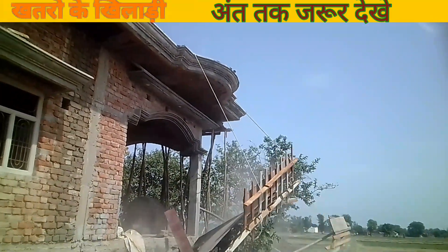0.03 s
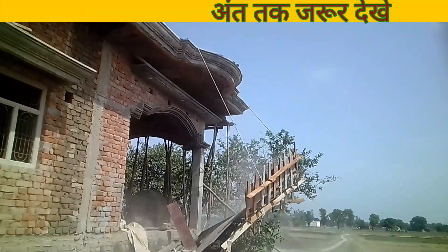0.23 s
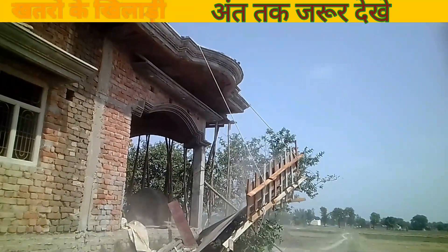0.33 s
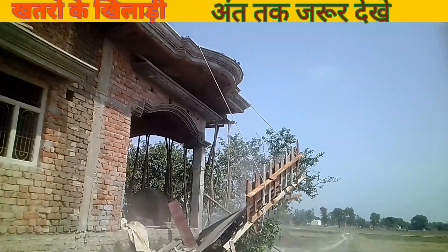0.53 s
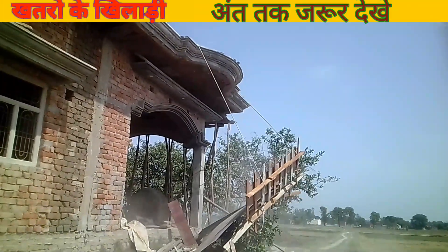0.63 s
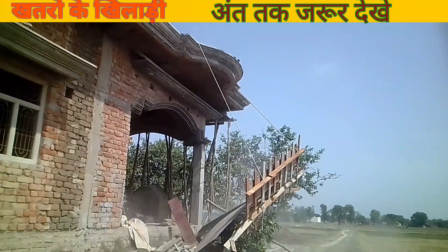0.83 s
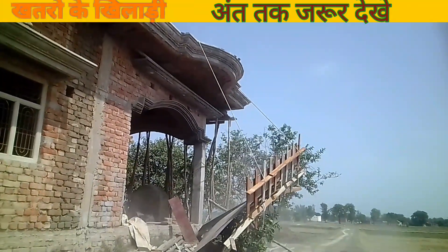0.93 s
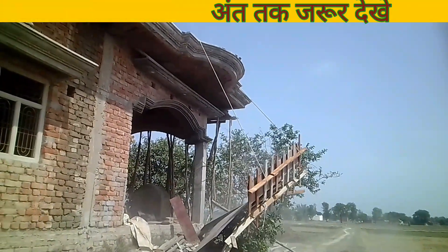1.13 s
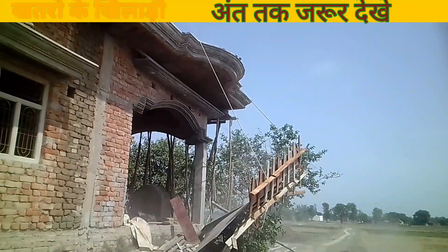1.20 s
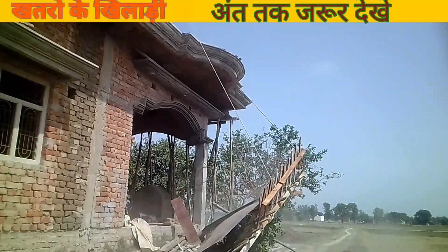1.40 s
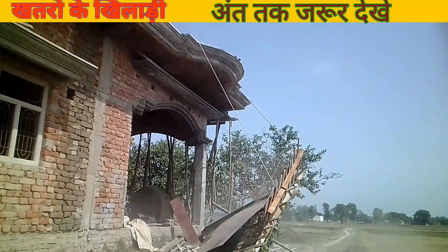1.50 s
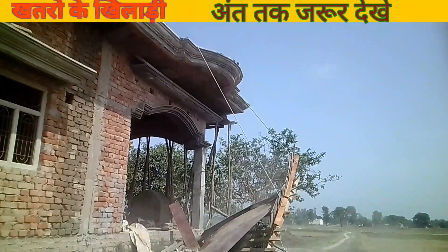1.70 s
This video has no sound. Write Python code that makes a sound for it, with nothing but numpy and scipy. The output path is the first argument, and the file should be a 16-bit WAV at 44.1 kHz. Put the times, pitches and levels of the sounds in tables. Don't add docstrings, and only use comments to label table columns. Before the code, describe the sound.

A timber and sheet-metal roof crashes down outdoors with dull thuds, rattling metal and settling debris.

```python
import sys
import numpy as np
from scipy import signal
from scipy.fft import rfft, irfft
from scipy.io import wavfile

SR = 44100
rng = np.random.default_rng(int(sys.argv[2]) if len(sys.argv) > 2 else 0)


def store_wav(level_fs):
    pcm = np.round(np.clip(np.atleast_2d(level_fs), -1, 1) * 32767)
    wavfile.write(sys.argv[1], SR, pcm.T.astype(np.int16))


def volts_from_decibels(level):
    exponent = np.asarray(level, float) / 20
    return 10 ** exponent


N = 77175

# frequency in Hz, level in dB per Hz.
AIR_SPECTRUM = [(18, -58), (30, -15), (145, -30), (295, -0.5), (586, -7.5), (789, -26), (1840, -14),
                (3040, -26.5), (7080, -29.5), (9200, -39.5), (15600, -120)]
# peak in seconds, level in dB, rise in seconds, fall in seconds, centre in Hz.
FALL_THUDS = [(.115, -56.5, 0.029, 0.0074, 396), (.198, -29, 0.014, 0.0086, 560),
              (.222, -25.5, 0.013, 0.019, 600), (.256, -23.5, 0.003, 0.024, 680),
              (.272, -28.5, 0.0045, 0.0056, 323), (.298, -29, 0.028, 0.0046, 420),
              (.350, -38, 0.02, 0.14, 330), (.411, -30.5, 0.0027, 0.0084, 300.7),
              (.460, -27.5, 0.041, 0.02, 524), (.526, -35, 0.033, 0.012, 282),
              (.572, -35, 0.014, 0.013, 440), (.610, -36.5, 0.0081, 0.011, 417),
              (.640, -40.5, 0.0046, 0.0093, 426), (.695, -44.5, 0.041, 0.0066, 420)]
# peak in seconds, level in dB, rise in seconds, fall in seconds, centre in Hz.
SETTLING_THUDS = [(0.772, -39.5, 0.015, 0.032, 377), (0.848, -39.5, 0.0021, .008, 467),
                  (0.872, -48, 0.01, 0.0051, 475), (0.943, -51.5, 0.034, 0.093, 247),
                  (1.008, -43.5, 0.018, 0.028, 480), (1.041, -53, 0.012, 0.017, 481.5),
                  (1.123, -60, 0.016, 0.025, 439), (1.220, -65, .015, .04, 402),
                  (1.311, -52.5, 0.011, 0.015, 529), (1.533, -46, 0.0012, 0.029, 580),
                  (1.602, -44, 0.0086, 0.008, 580), (1.698, -57, 0.039, 0.0077, 376)]
# peak in seconds, level in dB, rise in seconds, fall in seconds, centre in Hz.
SHEET_CLATTER = [(.118, -59, .001, 0.011, 1640), (.165, -46, 0.0023, 0.0099, 2000),
                 (.200, -27.5, 0.0099, 0.0054, 1590), (.226, -27.5, 0.014, 0.02, 1640),
                 (.255, -29.5, .003, .01, 2200), (.272, -22, 0.01, 0.017, 1920),
                 (.303, -26, 0.072, 0.016, 1390), (.345, -34.5, 0.0089, 0.019, 2110),
                 (.408, -23, 0.0031, 0.0012, 2210), (.424, -28.5, 0.0036, 0.0056, 1750),
                 (.466, -22, 0.011, 0.0083, 1918), (.526, -41.5, 0.0014, 0.066, 2240),
                 (.580, -36.5, 0.023, 0.0087, 1235), (.612, -46, 0.0084, 0.037, 1533),
                 (.795, -52.5, 0.08, 0.02, 2200), (.934, -54, 0.0011, 0.014, 2410),
                 (1.002, -43.5, 0.0011, 0.0037, 2260), (1.035, -44, 0.042, 0.013, 1600),
                 (1.297, -61.5, 0.001, 0.0054, 2210), (1.312, -45.5, 0.0093, 0.014, 1814),
                 (1.460, -52.5, 0.0024, 0.012, 1636), (1.533, -34, 0.0016, 0.021, 1620),
                 (1.598, -36, 0.0079, 0.015, 1680), (1.688, -55, 0.001, 0.012, 1710),
                 (1.730, -68, 0.0043, 0.057, 1730)]
# peak in seconds, level in dB, rise in seconds, fall in seconds, centre in Hz.
CHIP_CRACKS = [(.181, -40, 0.0014, 0.027, 4170), (.252, -32, 0.0012, 0.032, 3890),
               (.272, -32, 0.02, 0.011, 4470), (.350, -53, 0.024, 0.037, 3900),
               (.408, -35, .002, 0.0022, 6550), (.4145, -35.5, 0.00091, 0.0024, 4280),
               (.4185, -24, 0.00092, 0.0045, 3990), (.442, -41.5, 0.024, 0.059, 4420),
               (.526, -57, .003, 0.045, 3680), (.567, -48.5, .003, 0.011, 3900),
               (.656, -41, 0.0004, 0.0031, 3170), (.690, -66.5, 0.03, 0.034, 4450),
               (.789, -56.5, 0.001, 0.014, 3520), (.934, -64.5, 0.0011, 0.011, 3670),
               (.968, -65.5, .001, 0.0041, 5300), (.828, -62, 0.0015, 0.011, 6960),
               (1.002, -61, 0.0006, 0.019, 4100), (1.297, -64.5, .001, 0.011, 3800),
               (1.329, -74.5, .001, 0.0052, 5500), (1.458, -69.5, 0.0013, 0.01, 4530),
               (1.533, -39, 0.0014, 0.024, 5000), (1.596, -40.5, 0.0015, 0.021, 5100),
               (1.700, -64, .002, 0.0056, 5000), (1.728, -69, 0.002, 0.008, 5400)]
# frequency in Hz, level in dB, T60 in seconds.
BOARD_MODES = [(254.9, -2, 0.15), (272.2, -2, 0.16), (330, 2, 0.045), (356.6, 1, 0.13), (420, -5, 0.059),
               (468.8, -3.5, 0.13), (504.3, 3, 0.077), (531.5, -5, 0.13), (592.8, 3, 0.061),
               (625.8, -2.5, 0.1), (720.6, -2, 0.063), (749, -6.5, 0.13)]
# frequency in Hz, level in dB, T60 in seconds.
SLAB_MODES = [(3480, -3.5, 0.065), (3560, -7.5, 0.18), (3795, -11.5, 0.12), (3920, -6.5, 0.096),
              (4490, -4, 0.07), (4926, -10.5, 0.066), (5470, -17.5, 0.22), (5380, -3.5, 0.055),
              (6900, -9.5, 0.072)]
# start in seconds, peak in dB, frequency in Hz, T60 in seconds.
HARD_KNOCKS = [(0.2454, -4.5, 407.4, 0.022), (.4135, -9, 2268, 0.02), (.4165, -13, 3504, 0.015),
               (.601, -24.5, 387, 0.035), (.608, -16, 390, 0.027), (1.030, -53.5, 732, 0.19),
               (.524, -33, 2440, 0.027), (.657, -27, 465, 0.059), (0.85, -38.5, 477, 0.029),
               (1.530, -38, 1487, 0.048), (1.592, -35, 1510, 0.036), (1.5975, -28.5, 1622, 0.037),
               (1.596, -43, 900, 0.033), (1.698, -48, 390, 0.14), (1.739, -47, 373, 0.069)]
# start in seconds, peak in dB,
# frequency in Hz, T60 in seconds.
LOW_KNOCKS = [(.220, -20, 497, 0.043), (.229, -21, 480, .022), (.260, -16, 460, 0.028),
              (.268, -17, 338, 0.061), (.280, -17.5, 408, 0.041), (.289, -16.5, 513, 0.029),
              (.410, -22.5, 410, 0.025), (.456, -24, 533, 0.037), (.466, -22.5, 412, .04),
              (.475, -30.5, 530, 0.022), (.494, -26.5, 446, 0.024), (0.635, -27.5, 389, 0.047),
              (.647, -25.5, 489, 0.024), (.678, -30, 380, 0.034), (.687, -30.5, 473, 0.027),
              (.696, -35.5, 370, 0.027), (0.706, -35, 403, 0.033), (.774, -36.5, 530, 0.033),
              (.792, -35, 484, 0.035), (.804, -36, 361, 0.036), (.866, -41, 550, 0.028),
              (1.011, -36.5, 485, .04), (1.04, -45, 560, 0.022), (1.067, -42.5, 498, 0.022)]
# start in seconds, peak in dB, frequency in
# Hz, T60 in seconds.
BRIGHT_KNOCKS = [(.224, -22.5, 2270, 0.022), (.251, -21.5, 2330, 0.019), (.268, -21, 2050, .03),
                 (.300, -25.5, 2310, 0.034), (.308, -21.5, 1325, 0.025), (.4165, -21, 4040, 0.0087),
                 (.420, -20, 4720, 0.012), (.419, -13.5, 2019, 0.016), (.424, -22.5, 1451, .03),
                 (.427, -21.5, 2370, 0.016), (.448, -26.5, 3200, .015), (.448, -28.5, 1975, 0.019),
                 (.463, -23, 2421, 0.021), (.9425, -48.5, 2470, 0.023), (.973, -52, 2350, 0.023),
                 (1.003, -42, 2043, 0.022), (1.004, -52, 3570, 0.024), (1.030, -45, 1516, 0.064),
                 (1.531, -40, 4990, 0.022), (1.533, -39, 1211, 0.024), (1.597, -44, 1811, 0.2),
                 (1.615, -46, 1866, .08), (1.686, -49.5, 1790, 0.045), (1.725, -52.5, 1860, 0.063),
                 (1.725, -58, 2850, 0.049)]

AIR_DB = -68.5
PORCH_T60_S, PORCH_DB, PORCH_TOP_HZ = 0.54, -20, 3000
MIC_LOW_HZ, MIC_TOP_HZ, HISS_DB = 206.5, 5795, -88
BASS_LEAK_DB, TREBLE_LEAK_DB, AIRY_LEAK_DB = -23.5, -19, -26.5
GROUND_DIP_HZ, GROUND_DIP_WIDTH_HZ, GROUND_DIP = 3130, 350, 0.23
SQUEAK_S, SQUEAK_LENGTH_S, SQUEAK_DB = 1.398, 0.071, -64
SQUEAK_HZ, SQUEAK_RISE_HZ, SQUEAK_FLUTTER = 2550, 71, 0.45
GATHER_MAX_S = 0.08
KNOCK_RISE_S = 0.0025
CRACKS_PER_S, CRACK_SCATTER_DB, CRACK_WIDTH, CRACK_DB = 5000, 4.5, 0.38, -1.5
SLAB_FROM_S, SLAB_RING_DB = 1.5, -12
CLATTER_PER_S, CLATTER_SCATTER_DB, CLATTER_WIDTH, CLATTER_DB = 2800, 4.5, 0.57, -0.5
SHEET_LOW_HZ, SHEET_TOP_HZ, SHEET_T60_S = 944.5, 2852, 0.079
SHEET_MODES, SHEET_RING_DB = 36, -2
THUDS_PER_S, THUD_SCATTER_DB, THUD_WIDTH, THUD_DB = 1200, 3.5, 0.42, 1.5
THUMP_DB, BOARD_TOP_HZ = -8, 810


def unit(x):
    return x / np.sqrt(np.mean(x ** 2))


def lowpass(x, order, hz):
    return signal.sosfilt(signal.butter(order, hz, fs=SR, output="sos"), x)


def band(x, hz, width_hz, order=1):
    half = np.sqrt(1 + (width_hz / hz / 2) ** 2) + width_hz / hz / 2
    edges = [hz / half, min(hz * half, SR / 2.2)]
    return signal.sosfilt(signal.butter(order, edges, "bandpass", fs=SR, output="sos"), x)


def air():
    hz = np.maximum(np.arange(N // 2 + 1) * SR / N, 1)
    table_hz, table_db = np.transpose(AIR_SPECTRUM)
    db = np.interp(np.log(hz), np.log(table_hz), table_db)
    hush = unit(irfft(rfft(rng.standard_normal(N)) * volts_from_decibels(db), N))
    flicker = unit(band(rng.standard_normal(N), 29, 60))
    return volts_from_decibels(AIR_DB + 2.3 * flicker) * hush


def porch(x):
    t = np.arange(int(SR * 0.6)) / SR
    onset = np.clip(t / 0.0035, 0, 1)
    tail = rng.standard_normal(len(t)) * 1000. ** (-t / PORCH_T60_S) * onset
    tail = lowpass(tail, 1, PORCH_TOP_HZ)
    return volts_from_decibels(PORCH_DB) * signal.fftconvolve(x, tail / np.sqrt(np.sum(tail ** 2)))[:N]


def microphone(x):
    thin = signal.sosfilt(signal.butter(7, MIC_LOW_HZ, "highpass", fs=SR, output="sos"), x)
    thin = thin + volts_from_decibels(BASS_LEAK_DB) * band(x, 91, 110, order=2) * 4
    dull = lowpass(thin, 6, MIC_TOP_HZ)
    treble = volts_from_decibels(TREBLE_LEAK_DB) * band(x, 7600, 2800, order=2)
    airy = volts_from_decibels(AIRY_LEAK_DB) * band(x, 12800, 4000, order=3)
    hiss = volts_from_decibels(HISS_DB) * band(rng.standard_normal(N), 11000, 9000)
    return dull + treble + airy + hiss


def squeak():
    t = np.arange(N) / SR - SQUEAK_S
    progress = np.clip(t / SQUEAK_LENGTH_S, 0, 1)
    wobble = unit(band(rng.standard_normal(N), 150, 200))
    hz = SQUEAK_HZ + SQUEAK_RISE_HZ * progress + 50 * wobble
    phase = 2 * np.pi * np.cumsum(hz) / SR
    envelope = np.sin(np.pi * progress) ** 0.14 * (1 + SQUEAK_FLUTTER * wobble)
    return volts_from_decibels(SQUEAK_DB) * envelope * np.sin(phase)


def knocks():
    out = np.zeros(N + SR)
    t = np.arange(SR // 4) / SR
    for at_s, db, hz, t60 in HARD_KNOCKS + LOW_KNOCKS + BRIGHT_KNOCKS:
        rattle = 1 + 0.25 * unit(band(rng.standard_normal(len(t)), hz / 6, hz / 4))
        rise = np.sin(np.pi / 2 * np.minimum(t / (KNOCK_RISE_S + 1 / hz), 1)) ** 2
        tone = 1000. ** (-t / t60) * np.sin(2 * np.pi * hz * t)
        start = int(at_s * SR)
        out[start:start + len(t)] += volts_from_decibels(db) * rise * rattle * tone * 2
    return out[:N]


def blows(per_s, scatter_db):
    hit = rng.random(N) < per_s / SR
    size = volts_from_decibels(scatter_db * np.minimum(rng.exponential(size=N), 2))
    return unit(hit * np.sign(rng.standard_normal(N)) * size)


def swell(at_s, db, rise_s, fall_s):
    t = np.arange(N) / SR - at_s
    gather = t / max(rise_s, 1e-4) - (t / GATHER_MAX_S) ** 4
    return volts_from_decibels(db) * np.exp(np.where(t < 0, gather, -t / max(fall_s, 1e-4)))


def showers(table, grains, width):
    total = np.zeros(N)
    for at_s, db, rise_s, fall_s, hz in table:
        shower = grains * swell(at_s, db, rise_s, fall_s)
        total += band(shower, hz, width * hz) * np.sqrt(SR / 3 / width / hz)
    return total


def ring(x, modes):
    t = np.arange(int(SR / 4)) / SR
    body = np.zeros(len(t))
    for k, (hz, db, t60) in enumerate(modes):
        body += (-1) ** k * volts_from_decibels(db) * np.sin(2 * np.pi * hz * t) * 1000. ** (-t / t60)
    return signal.fftconvolve(x, body / np.sqrt(np.sum(body ** 2)))[:N]


def chips():
    dry = showers(CHIP_CRACKS, blows(CRACKS_PER_S, CRACK_SCATTER_DB), CRACK_WIDTH)
    late = dry * (np.arange(N) > SLAB_FROM_S * SR)
    cracks = dry + volts_from_decibels(SLAB_RING_DB) * ring(late, SLAB_MODES)
    return volts_from_decibels(CRACK_DB) * band(cracks, 4000, 7700, order=2)


def sheets():
    dry = showers(SHEET_CLATTER, blows(CLATTER_PER_S, CLATTER_SCATTER_DB), CLATTER_WIDTH)
    dry = band(dry, 1373, 1750, order=4)
    modes = []
    for k in range(SHEET_MODES):
        place = (k + rng.random()) / SHEET_MODES
        hz = SHEET_LOW_HZ + (SHEET_TOP_HZ - SHEET_LOW_HZ) * place
        modes.append((hz, -6 * rng.random(), SHEET_T60_S))
    ringing = volts_from_decibels(SHEET_RING_DB) * ring(dry, modes) / 3
    return volts_from_decibels(CLATTER_DB) * (dry + ringing) / np.sqrt(2)


def boards():
    grains = blows(THUDS_PER_S, THUD_SCATTER_DB)
    push = showers(FALL_THUDS + SETTLING_THUDS, grains, THUD_WIDTH)
    wood = ring(push, BOARD_MODES) / 6 + volts_from_decibels(THUMP_DB) * push
    return volts_from_decibels(THUD_DB) * lowpass(wood, 4, BOARD_TOP_HZ)


def scene():
    roof = boards() + sheets() + chips() + knocks() + squeak()
    roof = roof - GROUND_DIP * band(roof, GROUND_DIP_HZ, GROUND_DIP_WIDTH_HZ)
    return (microphone(roof + porch(roof)) + air())[None]


def top_cut(x):
    return signal.sosfilt(signal.butter(12, 15500, fs=SR, output="sos"), x)


def record(dry):
    return top_cut(dry)


dry = scene()
out = record(dry)
store_wav(out)
```